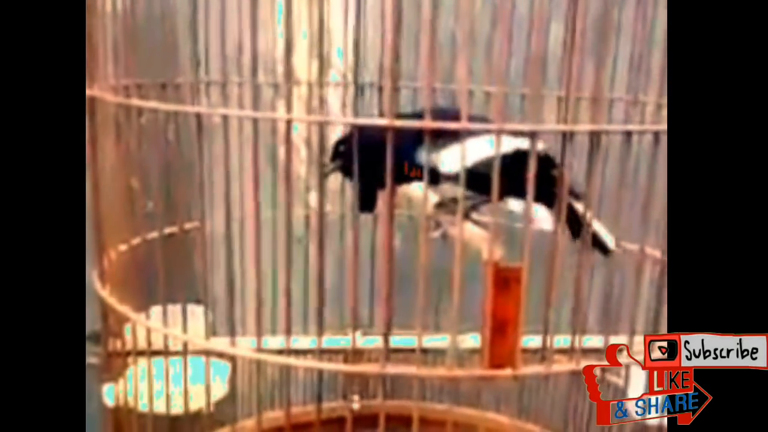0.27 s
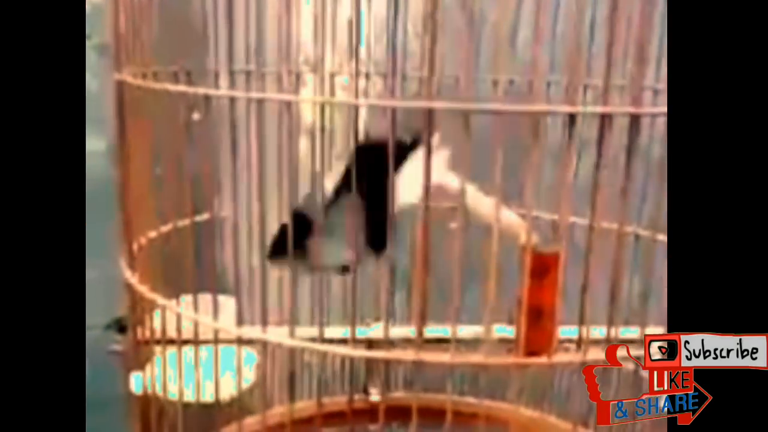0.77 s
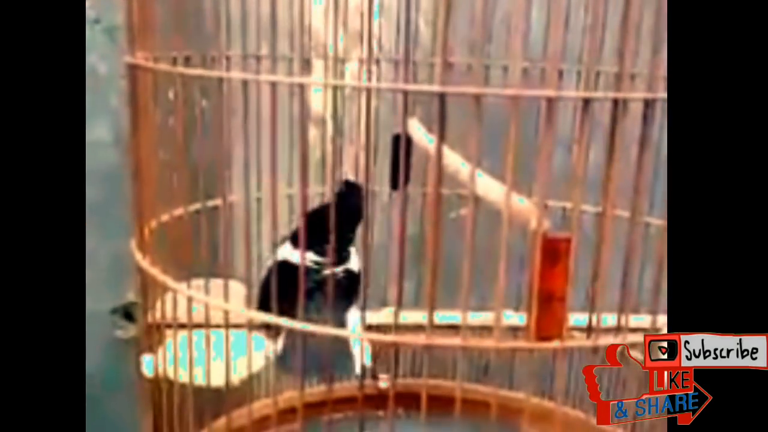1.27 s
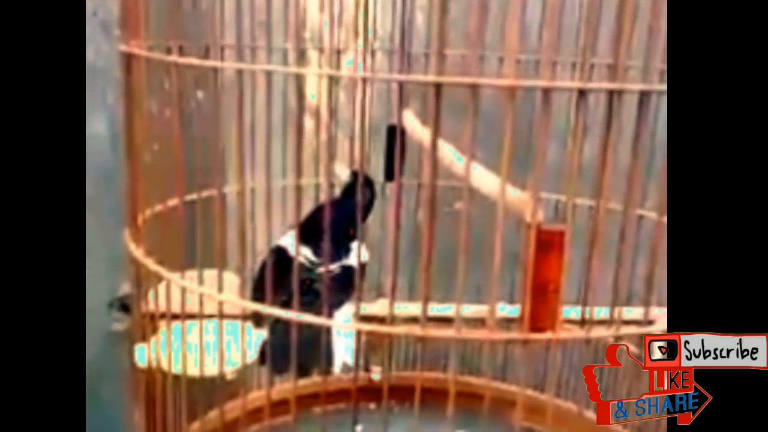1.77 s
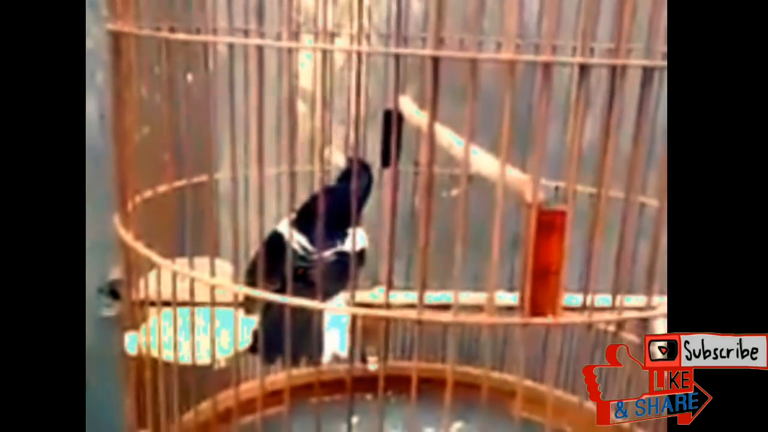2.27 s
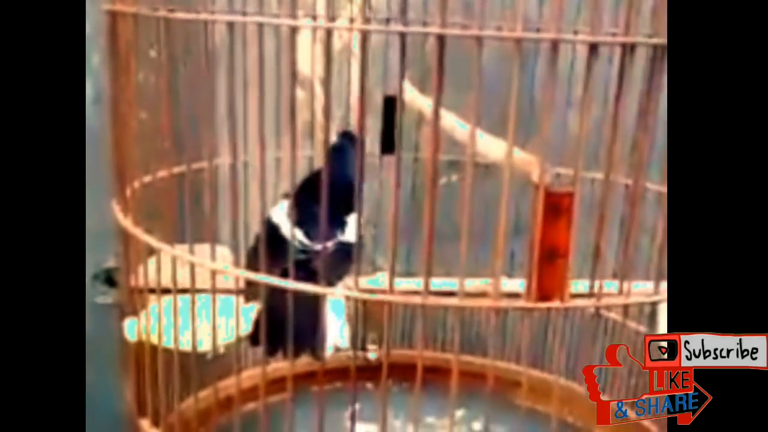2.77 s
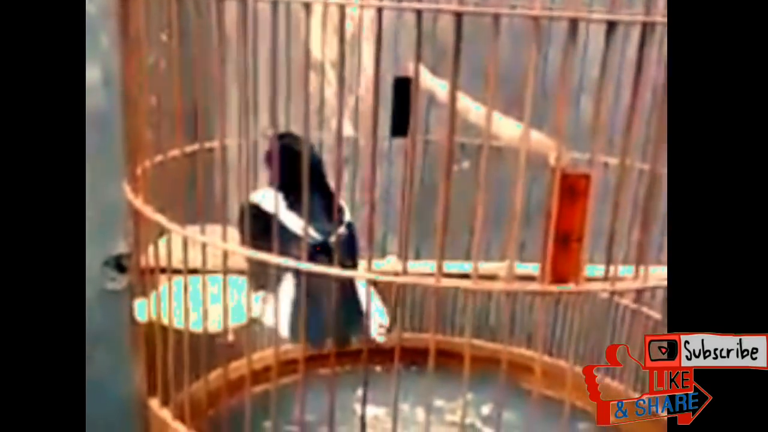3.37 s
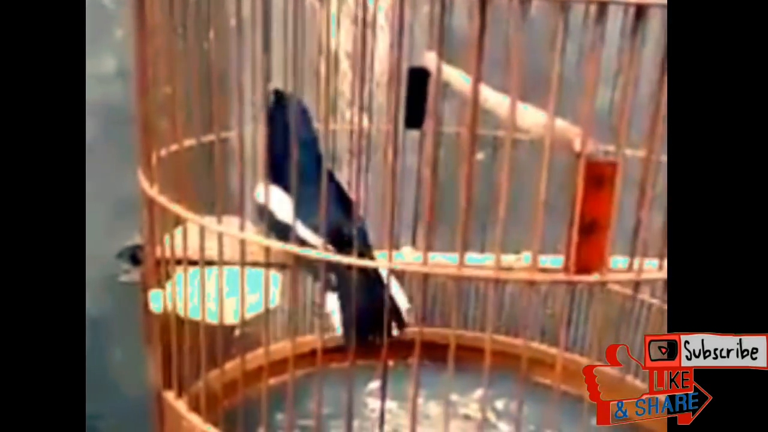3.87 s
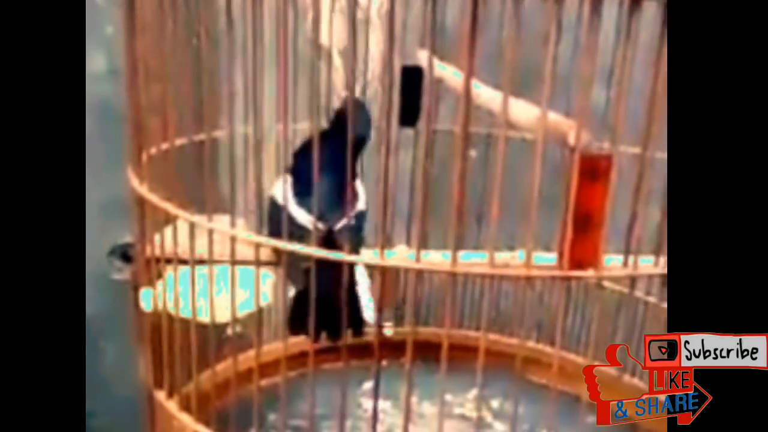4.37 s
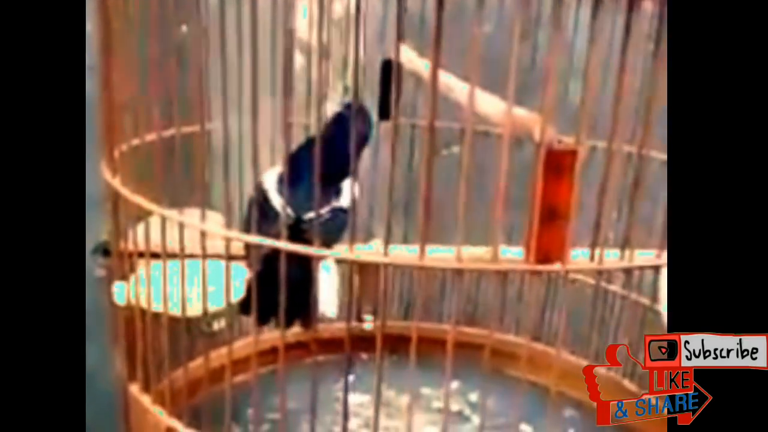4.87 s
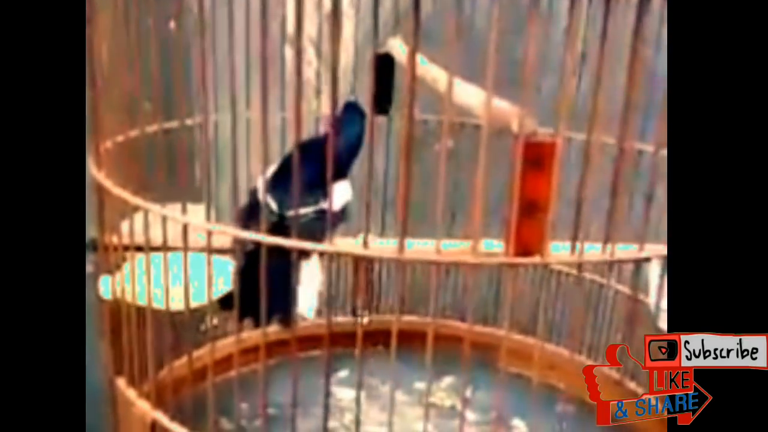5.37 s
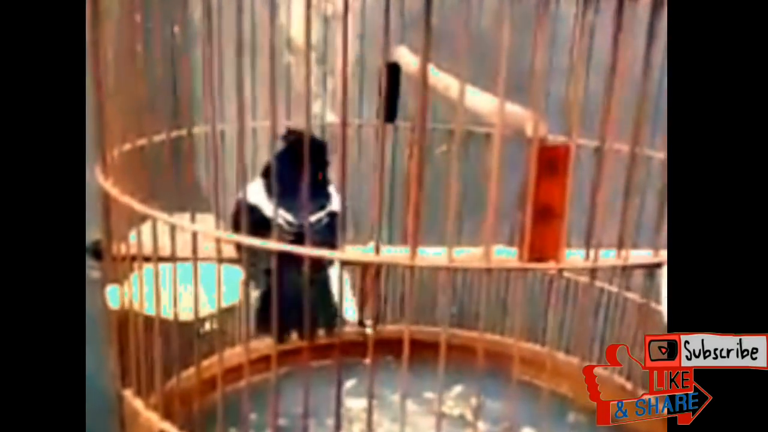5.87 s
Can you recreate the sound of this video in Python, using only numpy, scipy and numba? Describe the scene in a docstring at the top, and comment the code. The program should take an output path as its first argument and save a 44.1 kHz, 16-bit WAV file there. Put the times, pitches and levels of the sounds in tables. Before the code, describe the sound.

A caged songbird sings close to a small stereo recorder, mostly left of centre, with quick bright reflections from hard walls. At 0 s a harsh, buzzy cry falls from high to low by about 0.4 s. From 0.6 to 0.9 s come four short scratchy rasps with dull wing thumps, then a longer rasp at 1.0. Around 1.3 and 1.6 s a whistle rises into sharp chips. Near 1.9 and 2.3 s ringing, multi-voiced whistles lead into broad rasps at 2.05 and 2.4. Brief chirps at 2.7-2.9 give way to quiet low notes and a mellow warble at 3.25-3.6. At 3.85 a steep sweep shoots up to a piercing whistle. From 4.15 to 6.1 s high whistles, pips, snaps, buzzes and rasps tumble out rapidly, with soft hopping thumps near the end. Low outdoor rumble stays faint, ducking beneath loud notes.

```python
"""A magpie-robin sings one long varied run in a wooden cage, close to a small stereo recorder between hard walls.
Each side of its syrinx is a tone with overtones; flutter roughens whistles and slurs into buzzy notes, often
two at once. Harsh rasps are a chaotic pitch swing with air noise. Thumps of hopping are shaped noise bursts,
the yard is low rumbling noise; the recorder's gain control ducks the yard under every loud note."""
import sys
import numpy as np
from scipy import signal
from scipy.fft import rfft, irfft, next_fast_len
from scipy.io import wavfile
from scipy.ndimage import uniform_filter1d
from numba import njit

SR = 44100
rng = np.random.default_rng(int(sys.argv[2]) if len(sys.argv) > 2 else 0)


def master(y):
    """Save y as 16-bit WAV."""
    cut = np.clip(np.atleast_2d(y).T, -1, 1)
    pcm = np.round(cut * 32767)  # scale
    wavfile.write(sys.argv[1], SR, pcm.astype(np.int16))


N = 269892

LEAD_S = 0.02  # margin ahead of and after each call
CAGE_DB, CLEAR_CAGE_DB, CAGE_DECAY_S = 5.5, 2, 0.0017
BURST_ATTACK_S = 0.001
HELD_ATTACK_S, HELD_RELEASE_S = 0.0011, 0.0012


def undb(db):
    """Decibels to gain."""
    return 10 ** (np.asarray(db) / 20)


def unit(x):
    """Scale to rms 1."""
    return x / np.sqrt(np.mean(x ** 2) + 1e-18)


def pan(left_minus_right_db):
    """Left and right gains for a level difference."""
    return unit(undb(np.array([[left_minus_right_db], [-left_minus_right_db]]) / 2))


def add(out, start_s, x):
    """Mix x into out from start_s on."""
    first = min(int(start_s * SR), N)
    x = x[:, max(-first, 0):]
    first = max(first, 0)
    out[:, first:first + x.shape[1]] += x[:, :N - first]


def colour(x, points):
    """Filter by a spectrum of (Hz, dB) points."""
    hz, db = np.transpose(points)
    size = next_fast_len(x.shape[-1] + SR // 20)
    bins_hz = np.fft.rfftfreq(size, 1 / SR) + 1
    gain = undb(np.interp(np.log(bins_hz), np.log(hz), db))
    return irfft(rfft(x, size) * gain, size)[..., :x.shape[-1]]


def wander(cutoff_hz, count):
    """Random motion slower than cutoff_hz, spread 1."""
    sos = signal.butter(5, cutoff_hz, fs=SR, output="sos")
    noise = rng.standard_normal(max(count, SR // 2))
    return unit(signal.sosfilt(sos, noise))[:count]


def effort(length_s, swell_db, attack_s=0.0025, release_s=0.009):
    """Progress 0-1 and loudness of one call: it opens, swells or fades, and dies away."""
    count = min(int((length_s + 2 * LEAD_S) * SR), SR // 2)
    t = np.arange(count) / SR - LEAD_S
    progress = np.clip(t / length_s, 0, 1)
    opening = 1 / (1 + np.exp(-t / attack_s))
    closing = np.exp(-(np.maximum(t - length_s, 0) / release_s) ** 2)
    return progress, opening * closing * undb(swell_db * (progress - .5))


def syrinx(hz, loud, db, rough, paths):
    """One side of the syrinx gives a gliding tone; irregular flutter of the labia spreads it into a grainy buzz."""
    # left-right balance shifts with pitch, higher notes lean further left: pitch_hz, left_minus_right_db
    balance = [(1900, 4), (2300, 4), (3400, 6.5), (5200, 7.5), (7700, 10.5)]
    # how the throat passes overtones: frequency_hz, gain_db
    overtone_colour = [(2000, 2.5), (2900, 2.5), (3600, -8), (4500, 5.5), (5100, -4), (6000, -3),
                       (7600, -3), (9000, -19)]
    jitter = 0.001  # rms share of pitch
    buzz_hz, buzz_width_hz, buzz_share = 65, 820, 2.4
    grain_hz, grain_db, shimmer_db = 130, 4.5, 0.22
    overtone_db, overtone_step_db, overtone_breath = -36, -9, 3.5

    n, rough = len(hz), np.clip(rough, 0, 1)
    pan_db = np.interp(np.average(hz, weights=loud ** 2), *np.transpose(balance))
    hz = hz * (1 + jitter * wander(120, n))
    flutter_hz = buzz_hz + buzz_width_hz * np.mean(rough)
    flutter = 1 + buzz_share * rough * (wander(flutter_hz, n) + 1j * wander(flutter_hz, n))
    grain = undb((shimmer_db + grain_db * rough) * wander(grain_hz, n))
    phase = 2 * np.pi * np.cumsum(hz) / SR + np.angle(flutter)
    overtones = sum(undb(overtone_step_db * (k - 2)) * np.sin(k * phase) for k in range(2, 5))
    # overtones turn breathy in rough notes and flare where they cross a throat resonance
    breath = 1 + overtone_breath * rough * wander(230, n)
    overtones = colour(unit(overtones * breath), overtone_colour)
    # the throat is tuned to the loud notes: they come out purer than soft ones
    overtone_gain = undb(np.minimum(overtone_db - db, -14))
    voice = np.sin(phase) + overtone_gain * overtones
    tone = unit(np.abs(flutter) * grain * voice)
    return radiate(undb(db) * loud * tone, paths, pan_db)


def glides(rows, paths):
    """Each short note glides from one pitch to another along a sagging arc."""
    sag = 0.18  # glides linger at the low end
    out = np.zeros((2, N))
    for start_s, length_s, start_hz, end_hz, db, swell_db, rough in rows:
        u, loud = effort(length_s, swell_db)
        span = np.log(end_hz / start_hz)
        arc = 1 - (2 * u - 1) ** 2
        hz = start_hz * np.exp(span * u - sag * abs(span) * arc)
        add(out, start_s - LEAD_S, syrinx(hz, loud, db, rough, paths))
    return out


def buzzes(paths):
    """Gliding notes roughened by strong flutter of the labia."""
    # buzzy notes: start_s, length_s, start_hz, end_hz, level_db, swell_db, roughness (clipped to 0-1)
    buzz_rows = [(0, 0.21, 2914, 2713, -18, 0, 0.39), (0, 0.26, 6104, 5880, -17.5, -21, 0.65),
                 (2.68, 0.0054, 5720, 5430, -3, 5, 1), (2.692, 0.043, 2880, 2900, -12, -5, 0.79),
                 (2.803, 0.048, 5810, 6430, -18, 3, 0.27), (2.812, 0.1, 3800, 3927, -6, 6.5, 0.35),
                 (3.045, 0.036, 2200, 1773, -30.5, -13, 0.73), (3.229, 0.023, 2150, 1744, -31, 11, 0.48),
                 (3.323, 0.057, 2780, 2770, -30, -3, 0.68), (3.548, 0.097, 2526, 2203, -19.5, -7.5, 0.68),
                 (4.151, 0.044, 3900, 4370, 2.5, 17, 1.37), (4.225, 0.043, 4380, 4120, -4, 3.5, 0.7),
                 (4.212, 0.1, 6676, 6376, 0, -6.5, 0.44), (4.361, 0.036, 4277, 4280, -4.5, -11.5, 0.6),
                 (4.405, 0.023, 5840, 5750, -1.5, -16, 0.56), (4.448, 0.13, 6150, 6480, -15.5, -25.5, 0.54),
                 (4.554, 0.014, 3770, 3977, -7.5, -5.5, 0.49), (4.668, 0.077, 2162, 2068, -17.5, 2, 0.22),
                 (4.698, 0.025, 3560, 3846, -8.5, -4, 0.55), (4.777, 0.0097, 3400, 3180, -9.5, -14, 0.19),
                 (4.88, 0.086, 3223, 3060, -19, -16, 0.78), (5.006, 0.032, 2560, 2405, -13, -7.5, 0.54),
                 (5.12, 0.093, 6400, 5290, -13.5, -2, 0.47), (5.222, 0.02, 2800, 2500, -13, 0, 0.4),
                 (5.257, 0.036, 3900, 3864, -9, -5, 0.28), (5.29, 0.032, 7190, 7300, -4.5, -8.5, 0.75),
                 (5.32, 0.0097, 5440, 5330, -2, 3.5, 0.3), (5.345, 0.081, 4250, 3814, -12.5, -5, 0.4),
                 (5.531, 0.05, 2653, 3970, -13, 5.5, 0.45), (5.585, 0.038, 6610, 6010, -16, -7, 0.2),
                 (5.585, 0.023, 3390, 3100, -12.5, -20.5, 0.48),
                 (5.652, 0.052, 6110, 5370, -16.5, -9, 0.48), (5.732, 0.014, 3500, 3600, -14, 3, 0.15),
                 (5.79, 0.022, 4210, 3870, -14, -4.5, 0.5), (6.014, 0.0083, 1667, 2830, -19.5, 2, 0.28),
                 (6.022, 0.0027, 3560, 3565, -2, 9, 0.32), (6.05, 0.068, 6790, 6450, -22, 3, 0.27)]
    return glides(buzz_rows, paths)


def clear_notes(paths):
    """Gliding whistles with little flutter, and two syllables of several voices, each sung twice."""
    # clear whistles: start_s, length_s, start_hz, end_hz, level_db, swell_db
    whistles = [(0.195, 0.073, 2918, 2796, -13.5, -9), (2.275, 0.03, 3730, 3740, -12, 3.5),
                (2.784, 0.032, 2475, 3450, -14.5, 11), (3.07, 0.07, 1860, 1340, -25.5, -10.5),
                (3.337, 0.13, 1465, 1550, -27.5, 2), (3.548, 0.14, 1160, 956, -39, -12.5),
                (3.589, 0.052, 2680, 2540, -21.5, -2), (3.599, 0.068, 2116, 1876, -30, -6),
                (4.078, 0.078, 3170, 3344, -25.5, 18), (4.18, 0.031, 3460, 3680, -5.5, -4),
                (4.604, 0.0092, 3820, 3845, -4.5, 5), (4.625, 0.022, 4434, 3397, -3.5, -5.5),
                (4.727, 0.027, 4480, 3450, -5, 9), (4.857, 0.026, 3058, 3160, -16.5, 8),
                (4.875, 0.024, 1058, 1020, -38, 1.5), (4.886, 0.063, 2130, 2034, -18, 12.5),
                (5.104, 0.04, 3960, 3170, -9, -7.5), (5.115, 0.023, 2490, 2422, -7, -8),
                (5.234, 0.036, 2560, 2347, -18.5, 3), (6.05, 0.055, 3685, 3344, -9, -7)]
    # voices of a syllable: after_start_s, length_s, start_hz, end_hz, level_db, swell_db, roughness (0-1)
    rise_and_chip = [(0, 0.095, 2414, 2643, -24.5, 19.5, 0.1), (0, 0.065, 5400, 5700, -37, -12, 0.2),
                     (0.01, 0.12, 7630, 7900, -46.5, -3, 0.15), (0.068, .035, 3500, 3200, -20, 10, 0.7),
                     (.108, 0.0089, 4020, 4030, -15.5, -1, 0.2)]
    # voices of a syllable: after_start_s, length_s, start_hz, end_hz, level_db, swell_db, roughness (0-1)
    chord = [(0.005, 0.12, 2627, 2510, -18, 2, 0.007), (0.002, .13, 5700, 5600, -27.5, -16, 0.12),
             (0.01, 0.15, 6100, 6700, -22.5, 19, 0.17), (.025, 0.052, 4100, 4150, -8, 0.5, 0.34),
             (0.017, 0.15, 7200, 8400, -25, -5, 0.11)]
    # when the first is sung: start_s, time_stretch
    rises = [(1.311, 1), (1.622, 0.57)]
    # when the second is sung: start_s, time_stretch
    chords = [(1.886, 0.89), (2.284, .87)]
    whistle_rough = 0.11

    rows = [(*row, whistle_rough) for row in whistles]
    for voices, entries in ((rise_and_chip, rises), (chord, chords)):
        for start_s, stretch in entries:
            for after_s, length_s, *voice in voices:
                rows.append((start_s + after_s * stretch, length_s * stretch, *voice))
    return glides(rows, paths)


def slurs(paths):
    """Unbroken gestures of pitch, level and flutter: a harsh fall, a mellow warble, a steep sweep to a high buzz."""
    # harsh fall: time_s, pitch_hz, level_db, roughness (clipped to 0-1)
    fall = [(0, 4200, 4.5, 0), (.09, 4066, 5.5, 0.5), (.135, 4500, 3.5, 0.31), (.175, 3410, -4.5, 0.54),
            (.215, 2680, -5, 0.39), (.28, 2323, -19.5, 0.71), (.33, 1850, -29.5, 1.07),
            (.41, 1342, -41, 0.38)]
    # low mellow warble: time_s, pitch_hz, level_db, roughness (0-1)
    warble = [(3.242, 1500, -32, 0.45), (3.282, 1900, -18.5, 0.017), (3.303, 2050, -13, .02),
              (3.336, 1950, -17.5, 0.043), (3.361, 1880, -40, 0.45), (3.456, 1960, -43.5, 0.46),
              (3.472, 1900, -15, 0.031), (3.519, 1945, -7, 0.02), (3.554, 1850, -11, 0.038),
              (3.609, 1680, -37, 0.12)]
    # steep sweep up: time_s, pitch_hz, level_db, roughness (0-1)
    sweep = [(3.833, 1850, -23.5, 0.61), (3.855, 2729, -18, 1), (3.864, 3950, 0, 0.19),
             (3.882, 4780, 0.5, 0.47), (3.909, 6487, 8, 0.25), (3.935, 6480, -4.5, 0.35),
             (3.952, 6030, -22, 1), (4.154, 6190, -15.5, 0.87)]
    smooth_s = 0.0046
    out = np.zeros((2, N))
    for gesture in (fall, warble, sweep):
        times_s, *controls = np.transpose(gesture)
        length_s = times_s[-1] - times_s[0]
        u, loud = effort(length_s, 0)
        t = times_s[0] + u * length_s
        hz, db, rough = (uniform_filter1d(np.interp(t, times_s, c), int(smooth_s * SR)) for c in controls)
        add(out, times_s[0] - LEAD_S, syrinx(hz, loud, db, rough, paths))
    return out


def held_notes():
    """Pure notes and pips switch on and off sharply on one pitch; they reach both ears directly."""
    # held notes: start_s, length_s, pitch_hz, level_db, swell_db
    held_rows = [(3.917, 0.0088, 7370, -6, 12), (3.978, 0.056, 5813, -4.5, 5),
                 (4.041, 0.064, 5813, -14, -16), (4.34, 0.074, 5510, -8.5, -3),
                 (5.061, 0.015, 4424, -4, 13), (5.087, 0.01, 4383, 0, -7), (1.589, 0.023, 2454, -37.5, 2),
                 (5.47, 0.049, 2070, -25.5, -10), (5.577, 0.062, 4296, -6, -4.5),
                 (5.681, 0.052, 4316, -13, 3.5), (5.767, 0.012, 4410, -9.5, -8),
                 (5.839, 0.033, 4620, -6, 6.5), (5.873, 0.063, 4486, -21.5, 19.5)]
    # sharp little pips: start_s, pitch_hz, level_db
    pips = [(1.423, 4210, -4), (3.837, 4230, -3), (3.86, 3923, 9.5), (4.448, 5720, 4), (4.472, 5750, -4),
            (4.635, 3850, -7.5), (4.754, 3530, 3.5), (5.044, 4420, 3), (5.094, 3437, 3.5),
            (5.112, 3500, -2), (5.438, 3335, -0.5), (5.568, 4280, 2), (5.752, 4400, -1), (5.83, 4590, 1),
            (6.038, 3900, -2.5)]
    pip_s, held_rough = 0.002, 0.01
    direct = np.ones((2, 1))
    pip_rows = [(start_s, pip_s, hz, db, 0) for start_s, hz, db in pips]
    out = np.zeros((2, N))
    for start_s, length_s, hz, db, swell_db in held_rows + pip_rows:
        u, loud = effort(length_s, swell_db, HELD_ATTACK_S, HELD_RELEASE_S)
        add(out, start_s - LEAD_S, syrinx(np.full(len(u), hz), loud, db, held_rough, direct))
    return out


def snaps(paths):
    """A snap is a tone that drops through its pitch within a few milliseconds."""
    # sharp snaps: start_s, pitch_hz, level_db
    snap_rows = [(0.686, 7000, -5), (1.408, 2900, -7.5), (1.410, 5877, -10), (1.696, 4260, -4.5),
                 (4.741, 3993, -1.5), (5.19, 5160, -2.5), (5.399, 3450, -2.5), (5.426, 3360, -8),
                 (5.441, 4770, -3)]
    snap_s, snap_rough = 0.00259, 0.16
    snap_fall = 0.3  # natural log of the pitch ratio
    out = np.zeros((2, N))
    u, loud = effort(snap_s, 0, BURST_ATTACK_S / 2, HELD_RELEASE_S / 2)
    for start_s, centre_hz, db in snap_rows:
        hz = centre_hz * np.exp(snap_fall * (.5 - u))
        add(out, start_s - LEAD_S, syrinx(hz, loud, db, snap_rough, paths))
    return out


def rasps():
    """Overblown, the syrinx swings chaotically about a drifting pitch, with a rush of air, through throat and beak."""
    # harsh broad calls: start_s, length_s, level_db, swell_db, centre_hz
    rasp_rows = [(0, 0.18, -6.5, 3, 4600), (0.569, 0.02, -25.5, -1, 5500), (0.585, 0.042, -4, -3.5, 5400),
                 (.685, 0.04, -4, -5.5, 5600), (0.795, 0.041, -5.5, -3, 5300), (0.916, 0.044, -9, -9, 5000),
                 (1.013, 0.13, -4, -3, 5300), (1.407, 0.027, -14.5, 0, 4700),
                 (1.673, 0.028, -13.5, 14.5, 3900), (2.048, 0.11, -5, -2.5, 5200),
                 (2.417, 0.14, -4.5, 0.5, 5200), (3.837, 0.056, -10, 1, 4000),
                 (4.881, 0.34, -25.5, 15, 5200), (5.168, 0.039, -10, -7.5, 4900),
                 (5.261, 0.064, -11.5, -3.5, 5600), (5.359, 0.1, -16, -3.5, 4800),
                 (5.527, 0.043, -16, 6, 5200), (5.634, 0.32, -21.5, -2, 4265),
                 (6.017, 0.033, -13, -10, 5000)]
    # wide open throat: frequency_hz, gain_db
    rasp_colour = [(900, -29), (1500, -16.5), (1900, -8.5), (2400, -5), (3300, -0.5), (3950, -2.5),
                   (4400, 1.5), (5300, -0.5), (6500, 4), (7200, -3.5), (9000, -5.5)]
    swing, swing_hz = 0.28, 776.6  # swing and drift: rms in log pitch
    drift, drift_hz = 0.1, 45.41
    air_db, pulse_db, pulse_hz = -4, 3.5, 190
    ease_attack_s, narrow_throat_db = 0.005, -9.5
    band_spacing_hz, band_db = 170, 3.5
    floor_echo_s, floor_echo_db = 0.0027, -5
    crack_db, crack_s, pan_db = 3, 0.008, 6
    out = np.zeros((2, N))
    for start_s, length_s, db, swell_db, centre_hz in rasp_rows:
        # a fading rasp bursts open with a crack; a swelling one eases in
        burst = np.clip(-swell_db / 2, 0, 1)
        attack_s = burst * BURST_ATTACK_S + (1 - burst) * ease_attack_s
        u, loud = effort(length_s, swell_db, attack_s)
        n = len(u)
        hz = centre_hz * np.exp(swing * wander(swing_hz, n) + drift * wander(drift_hz, n))
        tone = unit(np.sin(2 * np.pi * np.cumsum(hz) / SR))
        source = tone + undb(air_db) * wander(SR / 4, n)
        # gritty pulses; only a bursting rasp opens the throat to its lowest notes
        source = colour(source * undb(pulse_db * wander(pulse_hz, n)), rasp_colour)
        source = colour(source, [(1500, (1 - burst) * narrow_throat_db), (2100, 0.013)])
        # throat and beak ring in different narrow bands on every call
        bands_hz = np.arange(1000, 9000, band_spacing_hz)
        bands_db = band_db * rng.standard_normal(len(bands_hz))
        source = colour(source, np.column_stack([bands_hz, bands_db]))
        # cage-floor echo combs it, different for each place of the head
        delay = int(floor_echo_s * rng.uniform(.5, 2) * SR)
        source = source + undb(floor_echo_db) * np.roll(source, delay)
        crack = undb(burst * crack_db * np.exp(-u * length_s / crack_s))
        call = undb(db) * loud * crack * unit(source)
        add(out, start_s - LEAD_S, radiate(call, cage(CAGE_DB), pan_db))
    return out


def radiate(call, paths, pan_db):
    """Send a call along the cage's paths; each ear gets its share of the energy."""
    ears = signal.fftconvolve(call[None], paths, axes=1)
    ear_norms = np.linalg.norm(ears, axis=1, keepdims=True)
    return pan(pan_db) * ears * np.linalg.norm(call) / ear_norms


def cage(scatter_db):
    """Direct sound and short reflections from floor, perch and wall, different at each ear."""
    t = np.arange(SR // 50) / SR
    scatter = rng.standard_normal((2, len(t))) ** 3  # sparse strong echoes
    direct = t == 0
    return direct + undb(scatter_db) * unit(scatter * np.exp(-t / CAGE_DECAY_S)) / np.sqrt(len(t))


def walls(x):
    """Dense quick reflections from the near walls, then a longer weak tail."""
    # walls return high notes most: frequency_hz, gain_db
    wall_colour = [(1400, -2.5), (2600, -1.5), (3400, 3), (4400, 1.5), (6500, 1)]
    near_db, near_t60_s = -7, 0.19
    far_db, far_t60_s = -17, 0.52
    t = np.arange(SR) / SR
    echo = 0
    for db, t60_s in ((near_db, near_t60_s), (far_db, far_t60_s)):
        decay = np.exp(-np.log(1000) * t / t60_s)
        tail = rng.standard_normal((2, SR)) * decay * (t > .003)
        echo = echo + undb(db) * unit(tail) / np.sqrt(SR)
    return signal.fftconvolve(colour(x, wall_colour), echo, axes=1)[:, :N]


def hops():
    """Wings push puffs of air and feet knock the cage: dull, short thumps."""
    # wing beats and landings: start_s, level_db, decay_s (twice the time to the peak)
    thumps = [(0.651, -26, 0.048), (0.724, -24, 0.041), (4.174, -20.5, 0.0017), (5.533, -32, 0.095),
              (5.684, -22.5, 0.019), (5.733, -20, 0.015), (5.857, -30, 0.087), (5.968, -16.5, 0.012)]
    dull = [(30, -21), (90, -2.0), (200, -12.5), (400, -22.5), (1000, -75.0), (8000, -98)]
    out = np.zeros((2, N))
    t = np.arange(SR // 4) / SR
    for start_s, db, decay_s in thumps:
        noise = rng.standard_normal(len(t)) + rng.standard_normal((2, len(t)))
        puff = colour(noise, dull)
        thump = unit(puff * t * np.exp(-2 * t / decay_s)) * np.sqrt(decay_s / t[-1])
        add(out, start_s, pan(12.7) * undb(db) * thump)
    return out


def yard():
    """A low outdoor rumble that swells and sinks: coloured noise, largely alike in both ears."""
    # colour of the yard: frequency_hz, gain_db
    yard_colour = [(25, -10.5), (90, 7), (210, 3.5), (310, -7.5), (600, -12.5), (1200, -15.5),
                   (3000, -19.5), (8000, -27.5)]
    # swells of the rumble: time_s, level_db
    rumble = [(0, -40.5), (1.202, -49), (3.103, -46.5), (3.599, -42.5), (3.901, -45.5), (5.602, -47.5),
              (6.12, -40)]
    times_s, levels_db = np.transpose(rumble)
    air = colour(rng.standard_normal(N) + 0.081 * rng.standard_normal((2, N)), yard_colour)
    level_db = np.interp(np.arange(N) / SR, times_s, levels_db) + 3 * wander(9, N)
    return pan(7.5) * unit(air) * undb(level_db)


def scene():
    """The bird, its echo, and the yard around the cage."""
    # beak radiates little of the lowest notes, favours those near 2 kHz: frequency_hz, gain_db
    radiation = [(400, -56.5), (900, -0.5), (1400, 0.5), (2100, 1.5), (2700, -2), (3300, -5.5),
                 (6500, -3.5)]
    scattered, clear = cage(CAGE_DB), cage(CLEAR_CAGE_DB)
    song = buzzes(scattered) + clear_notes(clear) + held_notes()
    song = song + snaps(clear) + slurs(clear) + rasps()
    song = colour(song, radiation)
    return song + walls(song) + hops() + yard()


@njit
def follow(power, rise, fall):
    """Running power that rises quickly and falls slowly."""
    out, level = np.empty(len(power)), power[:400].mean()
    for i in range(len(power)):
        level += (power[i] - level) * (rise if power[i] > level else fall)
        out[i] = level
    return out


def record(dry):
    """Two-to-one gain control, little treble above 8.5 kHz, and rounded peaks that spit."""
    knee_db, attack_s, release_s, top_hz = -20.5, 0.012, 0.07, 15700
    power = follow(np.mean(dry ** 2, axis=0), 1 / (attack_s * SR), 1 / (release_s * SR))
    levelled = undb(2.5) * dry / np.sqrt(np.sqrt(1 + power / undb(knee_db) ** 2))
    heard = colour(levelled, [(6700, 1.5), (7100, 0), (8550, -1.5), (9050, -32.5), (15000, -38)])
    rounded = heard / (1 + np.abs(heard) ** 5) ** (1 / 5)
    lowpass = signal.ellip(8, .2, 70, top_hz, fs=SR, output="sos")
    return signal.sosfilt(lowpass, rounded)


dry = scene()
out = record(dry)
master(out)
```